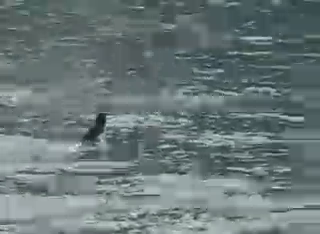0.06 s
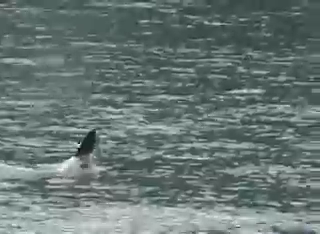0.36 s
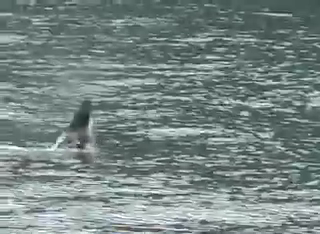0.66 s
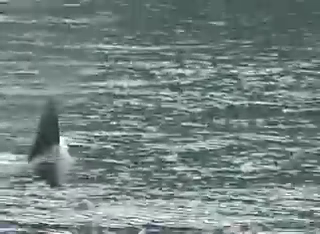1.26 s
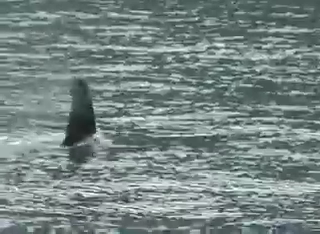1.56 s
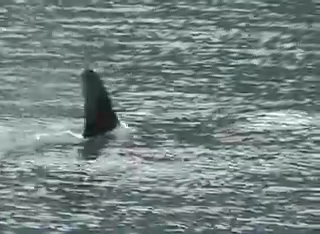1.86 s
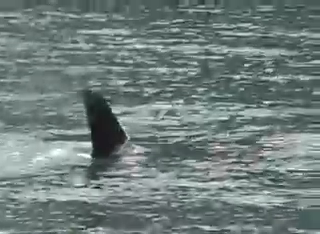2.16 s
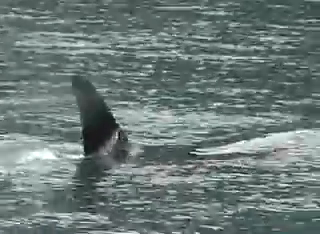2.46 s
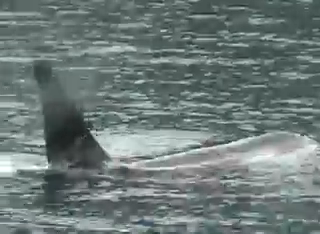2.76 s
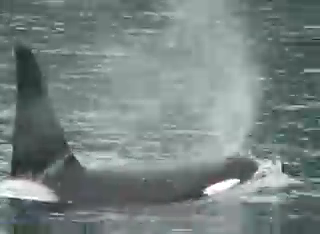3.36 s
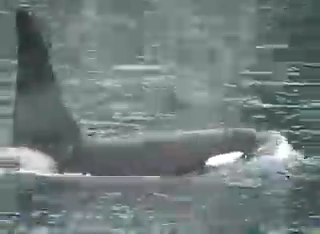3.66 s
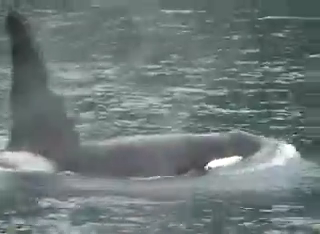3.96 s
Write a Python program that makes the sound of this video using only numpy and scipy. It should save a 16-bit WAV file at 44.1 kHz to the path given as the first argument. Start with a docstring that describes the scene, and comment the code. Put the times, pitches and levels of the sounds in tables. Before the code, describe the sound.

An orca blows once with a sudden whoosh, over wind, water and an idling boat engine.

```python
"""Light wind buffets the microphone over a wash of calm water, aboard a boat with an idling engine.
Water plops, and the camera whines and ticks in the hand. About three seconds in, an orca surfaces
off the boat and blows once over a low drone: the jet roars through the resonances of the blowhole
and thins into a hiss of spray. One sharp snap cuts across the tail."""
import sys
import numpy as np
from scipy import signal
from scipy.fft import rfft, irfft
from scipy.io import wavfile
from scipy.ndimage import uniform_filter1d

SR = 44100
rng = np.random.default_rng(int(sys.argv[2]) if len(sys.argv) > 2 else 0)


def log_audio(samples):
    """Write samples as a 16-bit WAV file to the path given in sys.argv[1]."""
    # one column per channel
    frames = np.atleast_2d(samples).T
    # limit to full scale, then quantise
    limited = np.clip(frames, -1, 1)
    pcm = np.round(limited * 32767).astype(np.int16)
    wavfile.write(sys.argv[1], SR, pcm)


N = 176400
T = np.arange(N) / SR
HZ = np.fft.rfftfreq(N, 1 / SR)


def amp(db):
    """Decibels to gain."""
    return 10 ** (np.asarray(db) / 20)


def unit(x):
    """Scales to rms 1."""
    return x / np.sqrt(np.mean(x ** 2) + 1e-20)


def spectrum(rows, hz=HZ, column=1):
    """Reads a column of a table on a log-frequency axis."""
    rows = np.array(rows)
    return np.interp(np.log(hz + 1e-6), np.log(rows[:, 0] + 1e-6), rows[:, column])


def curve(rows, column=1):
    """Reads a column of a table over time."""
    rows = np.array(rows)
    return np.interp(T, rows[:, 0], rows[:, column])


def wander(rate_hz):
    """Random wander of rms 1 up to a rate."""
    return unit(irfft(rfft(rng.standard_normal(N)) / (1 + (HZ / rate_hz) ** 4), N))


def noise(gain, likeness):
    """Stereo noise of rms 1 with a given spectrum and left-right likeness (correlation)."""
    mid, side = rfft(rng.standard_normal((2, N)))
    likeness = np.clip(likeness, -1, 1)
    mid, side = mid * np.sqrt(1 + likeness), side * np.sqrt(1 - likeness)
    return unit(irfft(np.array([mid + side, mid - side]) * gain, N))


def pan(db):
    """Gains that put the left channel db above the right."""
    return amp(np.array([[db], [-db]]) / 2)


def resonance(hz, width_hz):
    """Steep-sided resonance curve."""
    return 1 / (1 + ((HZ - hz) / width_hz) ** 2)


def tones(lines, waver_hz, waver_db, spread_rad):
    """Steady machine tones that waver a little in pitch and level."""
    out = np.zeros((2, N))
    for hz, db in lines:
        phase = 2 * np.pi * (np.cumsum(hz + waver_hz * wander(3.36)) / SR + rng.random())
        peak = np.sqrt(2) * amp(db + waver_db * wander(2.3))
        out += peak * np.sin(phase + spread_rad * np.array([[1], [-1]]))
    return out


# Open water and distant air, all around the boat: (frequency [Hz], relative density [dB])
WASH_SPECTRUM = [(20, -30), (40, -13), (52, -9), (74, -2.5), (105, -1.5), (145, -9), (195, 0), (270, -4),
                 (380, -1.5), (480, -8), (770, -10), (890, -14.5), (1100, -17), (1300, -20.5),
                 (2000, -23.5), (2400, -23.5), (6100, -30), (7300, -33.5), (8000, -43.5)]
# Its width across the microphone: (frequency [Hz], left-right likeness [0..1])
WASH_LIKENESS = [(60, 0.82), (130, 1), (680, 0.98), (1100, 0.77), (1700, 0.55), (3400, 0.66), (7600, 0.71)]
# Drift of its treble: (time [s], relative level [dB])
WASH_TREBLE = [(0, -0.5), (.3, 2), (.42, -1), (1.0, 0.5), (1.5, 0), (1.8, 2.5), (3.0, 3), (4, 6.5)]
# Swell of the low wash and the engine hum, on board: (time [s], relative level [dB])
BOAT_SWELL = [(0, -2), (2.2, 0.5), (2.7, 2), (4, 1)]
def wash(level_db=-35.5, crossover_hz=855):
    """Steady wash of water, air and boat; its bass swells with the engine and its treble drifts."""
    bed = noise(amp(spectrum(WASH_SPECTRUM)), spectrum(WASH_LIKENESS))
    bass = irfft(rfft(bed) / (1 + (HZ / crossover_hz) ** 4), N)
    bass_db = curve(BOAT_SWELL) + 1.1 * wander(25)
    treble_db = curve(WASH_TREBLE) + 0.96 * wander(31)
    return amp(level_db) * (bass * amp(bass_db) + (bed - bass) * amp(treble_db))


# The engine, heard from on board: (frequency [Hz], level before the swell [dB])
ENGINE_TONES = [(55.5, -48.5), (59.4, -45), (118.7, -45.5), (178.2, -44), (220, -48.5)]
def engine():
    """The idling engine hums in a few low tones that swell gently."""
    return amp(curve(BOAT_SWELL)) * tones(ENGINE_TONES, waver_hz=0.49, waver_db=2.0, spread_rad=0.13)


# Camera body, at the microphone: (frequency [Hz], width [Hz], level [dB], left-right likeness [-1..1])
CASE_RESONANCES = [(982, 41, -52, 0.96), (2520, 76, -68, -0.77), (6830, 160, -63.5, .7)]
# Its motor, just as close: (frequency [Hz], level [dB])
MOTOR_TONES = [(1749, -65), (2332, -65), (6778, -68), (6885, -65.5)]
def camera():
    """The motor whines thinly and stirs the resonances of the case."""
    case = sum(amp(db) * noise(resonance(hz, width), likeness)
               for hz, width, db, likeness in CASE_RESONANCES)
    return case + tones(MOTOR_TONES, waver_hz=1.2, waver_db=1.5, spread_rad=0.46)


# Wind rumble on the microphone: (frequency [Hz], relative density [dB])
RUMBLE_SPECTRUM = [(25, -27), (55, -3), (90, 1.5), (160, -4.5), (300, -16.5), (900, -38.5), (3000, -56.5)]
# Breeze across the boat, driving both rumble and eddies: (time [s], level [dB])
BREEZE = [(0, -37), (1.3, -39), (1.6, -43), (2.3, -47.5), (2.9, -43), (3.15, -44.5), (3.65, -57),
          (3.8, -35), (4, -42.5)]
def wind_rumble():
    """Low turbulence, unrelated at the two microphone ports, follows the breeze."""
    return noise(amp(spectrum(RUMBLE_SPECTRUM)), likeness=0) * amp(curve(BREEZE))


def wind_eddies(per_s=220, low_hz=150, high_hz=700, cycles=0.65, spread_db=3.0, clump_db=4.5, pan_db=3):
    """Small eddies pop at random on either microphone port."""
    out = np.zeros((2, N))
    t = np.arange(-1000, 1000) / SR
    pitches = np.geomspace(low_hz, high_hz, 10)
    for hz in pitches:
        hits = rng.random((2, N)) < per_s / len(pitches) / SR
        strength = amp(spread_db * np.minimum(rng.exponential(1, (2, N)), 2.5))
        pop = np.exp(-(t * hz / cycles) ** 2) * np.sin(2 * np.pi * (hz * t + rng.random()))
        out += signal.oaconvolve(hits * strength, pop[None], "same", axes=1)
    return unit(out * amp(clump_db * wander(19.0))) * amp(curve(BREEZE)) * pan(pan_db)


# Puffs right on the microphone: (time [s], half-length [s], level [dB], pitch [Hz], pan [dB])
PUFFS = [(0.022, 0.0065, -25.5, 254, 15.5), (.1, 0.016, -26, 293, 6), (0.363, 0.024, -24, 290, -3.5),
         (0.393, 0.027, -27.5, 398, -2), (0.507, 0.026, -27.5, 300, -0.5), (0.713, 0.028, -29, 260, 5.5),
         (.745, 0.019, -26, 280, 4.5), (0.809, 0.018, -30.5, 276, 7.5), (0.851, 0.014, -30, 270, 8),
         (0.896, 0.039, -27.5, 237, 1), (0.924, 0.009, -32.5, 417, 1), (1.014, 0.02, -25.5, 327, 4),
         (1.034, 0.0054, -29, 400, 14), (1.208, 0.045, -30, 245, 9), (1.3, 0.014, -26.5, 235, 2),
         (1.451, 0.015, -27.5, 340, 9.5), (1.761, 0.052, -25.5, 232, -2.5), (1.969, 0.04, -28.5, 220, 6.5),
         (2.783, 0.023, -29, 330, 3.5), (3.78, 0.02, -24, 240, 3), (3.928, 0.023, -25, 220, -5)]
# Spectrum of one puff: (frequency [multiple of its pitch], relative density [dB])
PUFF_SPECTRUM = [(.1, -17), (.4, 1), (.7, 4.5), (1.2, 1.5), (2, -6.5), (3.2, -17.5), (5, -27.5), (12, -51)]
def wind_buffets(size=8192):
    """Short puffs of wind hit the microphone, with separate turbulence at each port."""
    out = np.zeros((2, N))
    hz = np.fft.rfftfreq(size, 1 / SR)
    for centre_s, half_s, db, pitch_hz, pan_db in PUFFS:
        colour = amp(spectrum(PUFF_SPECTRUM, hz / pitch_hz))
        puff = irfft(rfft(rng.standard_normal((2, size))) * colour)
        span = np.arange(size) + int(np.clip(centre_s * SR - size / 2, 0, N - size))
        swell = np.exp(-2 * ((T[span] - centre_s) / half_s) ** 2)
        out[:, span] += unit(puff * swell) * np.sqrt(np.mean(swell ** 2)) * amp(db) * pan(pan_db)
    return out


# Thumps on and around the microphone: (time [s], pitch [Hz], half-length [s], level [dB], pan [dB])
POPS_AND_PLOPS = [(.366, 251, 0.0024, -20, -4), (.385, 425, .0014, -21.5, -4),
                  (.407, 279, 0.004, -20.5, -8), (.754, 203, 0.0025, -22.5, 9), (.881, 425, 0.0017, -25, 8),
                  (1.0307, 453, 0.0014, -14, 8), (1.216, 382, 0.00097, -25, 6),
                  (1.448, 440, 0.002, -21.5, 1), (1.463, 400, 0.0013, -27, 5),
                  (1.752, 279, .0018, -23.5, 10), (1.776, 382, 0.00094, -22, -6),
                  (1.855, 900, 0.0018, -21, 1), (1.975, 310, 0.0014, -23.5, 0),
                  (2.193, 194, 0.0036, -16, 9), (3.772, 134, 0.0076, -23, 6), (3.921, 251, 0.0018, -25, 19)]
def thumps():
    """Hard pops of wind, dull knocks and a plop of water, a few cycles each."""
    out = np.zeros((2, N))
    for centre_s, hz, half_s, db, pan_db in POPS_AND_PLOPS:
        swell = np.exp(-((T - centre_s) / half_s) ** 2)
        out += amp(db) * pan(pan_db) * swell * np.sin(2 * np.pi * hz * (centre_s - T))
    return out


# Handling, next to the microphone: (time [s], level [dB], frequency [Hz], width [Hz], decay [s])
HAND_TICKS = [(1.057, -37, 2520, 910, .003), (1.797, -31.5, 6360, 1200, 0.0017),
              (1.813, -40.5, 4400, 900, 0.007), (2.067, -36, 1590, 700, .006),
              (2.162, -33.5, 6500, 1500, 0.0012), (3.758, -31, 5400, 2000, 0.0042),
              (3.779, -29.5, 4700, 3180, .003), (3.837, -31, 5530, 2480, 0.0027),
              (3.842, -31.5, 5300, 2200, 0.013)]
def handling_ticks():
    """Brief bright ticks and scuffs of a hand on the camera."""
    out = np.zeros((2, N))
    for start_s, db, hz, width, decay_s in HAND_TICKS:
        envelope = (T >= start_s) * np.exp(-abs(T - start_s) / decay_s)
        out += amp(db) * envelope * noise(resonance(hz, width), likeness=0.72)
    return out


# A snap, dead centre at the microphone: (frequency [Hz], relative density [dB])
SNAP_SPECTRUM = [(200, -5.5), (800, 2), (2300, -1), (3500, -11), (5800, -11), (7200, -16.5)]
def snap(at_s=3.6988, peak_db=-12):
    """A single sharp push and pull of pressure."""
    delay = np.exp(-2j * np.pi * HZ * at_s)
    click = irfft(1j * amp(spectrum(SNAP_SPECTRUM)) * delay, N)  # 1j gives two opposite lobes
    return amp(peak_db) * click / abs(click).max()


# Low drone under the blow, heard from the boat: (time [s], pitch [Hz], level [dB])
DRONE_GLIDE = [(3.08, 77.6, -58), (3.2, 76.6, -38), (3.45, 72.7, -38), (3.65, 72.3, -37), (3.85, 66.9, -47),
               (4.0, 66, -42)]
def drone():
    """A low tone enters just ahead of the blow and sinks slowly."""
    phase = 2 * np.pi * np.cumsum(curve(DRONE_GLIDE)) / SR
    started = T > DRONE_GLIDE[0][0]
    return np.sqrt(2) * np.sin(phase) * amp(curve(DRONE_GLIDE, column=2)) * started


def mist(centre_s=3.44, half_s=0.096, hz=5600, width_hz=1400, db=-40):
    """Fine mist brightens the hiss as the plume spreads."""
    swell = np.exp(-((T - centre_s) / half_s) ** 2)
    return amp(db) * swell * noise(resonance(hz, width_hz), likeness=1.0)


# Hiss above the blowhole: (frequency [Hz], relative jet density [dB], relative spray density [dB])
HISS_SPECTRA = [(170, -26, -33), (344, 8.5, 5), (1200, 0, 0.5), (1670, -5, -7), (2020, -2, -8.5),
                (2300, 0.5, -1.5), (2930, 0.5, -3), (3300, 6.5, 7), (3580, 0, -2), (4080, 1.5, 2.5),
                (5000, -6.5, -2.5), (6140, -6, -9), (7270, -8.5, -9.5), (7800, -22, -9.5),
                (7900, -43, -30.5)]
# The change from jet to spray: (start [s], end [s])
JET_TO_SPRAY = [3.3, 3.39]
def plume_hiss(likeness):
    """The hiss of rushing air gives way to the hiss of spray."""
    jet = noise(amp(spectrum(HISS_SPECTRA)), likeness)
    spray = noise(amp(spectrum(HISS_SPECTRA, column=2)), likeness)
    spray_share = np.interp(T, JET_TO_SPRAY, [0, 1])
    return np.sqrt(1 - spray_share) * jet + np.sqrt(spray_share) * spray


# Resonances of the orca's airway: (pitch [Hz])
AIRWAY_PITCHES = [418, 630, 720, 783, 884, 1016, 1103, 1205, 1450]
# One row for each pitch: (width [Hz], weight at the start [dB], fully open [dB], in the tail [dB])
AIRWAY_MODES = [(49, 0, -9, -1), (71, -5, -4, -1), (26.2, -2.5, -0.5, -3), (24, -3, -5, -3),
                (40, -4, 0, -5), (20, -9.5, -7, -1.5), (34, -5, -4.5, -4.5), (45, -14, -7, -4),
                (200, -9, -14, -8.5)]
# Stages of the blowhole: (starts to widen [s], fully open [s], starts to relax [s], tail [s])
BLOWHOLE_STAGES = [3.21, 3.28, 3.33, 3.41]
# The jet favours resonances near a pitch that climbs as it pushes: (time [s], pitch [Hz])
JET_FOCUS = [(3.135, 440), (3.16, 740), (3.21, 720), (3.245, 790), (3.275, 1090), (3.305, 870),
             (3.35, 1110)]
def airway_roar(likeness, focus_db=4.5, focus_width_hz=160, bend_share=.012, bend_hz=9):
    """The jet rings the flexing airway; the higher resonances take over as it opens."""
    pushing = np.interp(T, BLOWHOLE_STAGES[2:], [1, 0])
    flexed_time = T + np.cumsum(bend_share * wander(bend_hz)) / SR  # bends all pitches together
    roar, power = 0, 0
    for hz, (width, start_db, open_db, tail_db) in zip(AIRWAY_PITCHES, AIRWAY_MODES):
        stage_db = np.interp(T, BLOWHOLE_STAGES, [start_db, open_db, open_db, tail_db])
        nearness = np.exp(-((hz - curve(JET_FOCUS)) / focus_width_hz) ** 2)
        weight = amp(stage_db + focus_db * pushing * nearness)
        ring = noise(resonance(hz, width), likeness)
        roar += weight * np.array([np.interp(flexed_time, T, side) for side in ring])
        power += weight ** 2
    roar = roar / np.sqrt(power)
    return roar / np.sqrt(uniform_filter1d((roar ** 2).mean(0), size=1300))  # the jet's force is steady


# The blow, across the water: (time [s], relative roar level [dB], relative hiss level [dB])
BLOW_LEVELS = [(3.135, -23.5, -33.5), (3.165, -22, -35.5), (3.21, -24, -30.5), (3.243, -19, -33.5),
               (3.255, -28, -32.5), (3.268, -21, -33.5), (3.29, -22, -34), (3.306, -18.5, -33.5),
               (3.325, -23.5, -31.5), (3.35, -23.5, -35.5), (3.40, -28.5, -32.5), (3.47, -28, -35),
               (3.515, -30.5, -34), (3.56, -31, -37), (3.66, -32.5, -36.5)]
# Its width across the microphone: (frequency [Hz], left-right likeness [0..1])
BLOW_LIKENESS = [(100, 1), (750, 0.96), (1100, .94), (2000, .78), (3300, 0.87), (7500, 0.63)]
def orca_blow(start_s=3.114, attack_s=.019, fade_s=3.602, roar_trim_db=-1.5, hiss_trim_db=1):
    """One breath bursts out as a fluttering jet; the roar dies down and droplets roughen the hiss."""
    likeness = spectrum(BLOW_LIKENESS)
    onset = np.clip((T - start_s) / attack_s, 0, 1)
    fading_s = np.maximum(T - fade_s, 0)
    roar_db = curve(BLOW_LEVELS) + roar_trim_db - 27 * fading_s
    hiss_db = curve(BLOW_LEVELS, column=2) + hiss_trim_db - 41 * fading_s
    roar = airway_roar(likeness) * amp(roar_db)
    hiss = plume_hiss(likeness) * amp(hiss_db)
    flutter_db = 1.3 * wander(rate_hz=90)
    plume = hiss + mist()
    sputter_db = 1.1 * wander(rate_hz=250)
    return onset * pan(-.5) * (roar * amp(flutter_db) + plume * amp(.5 * flutter_db + sputter_db))


def scene():
    """The orca from the boat, with water and engine behind it and wind and camera up close."""
    return (orca_blow() + drone() + wash() + engine() + wind_buffets() + wind_eddies() + wind_rumble()
            + camera() + thumps() + handling_ticks() + snap())


def record(dry):
    """The recorder's band limit cuts the top treble steeply."""
    lowpass = signal.firwin(701, cutoff=8030, window=("kaiser", 9), fs=SR)
    return signal.oaconvolve(dry, lowpass[None], "same")


dry = scene()
out = record(dry)
log_audio(out)
```